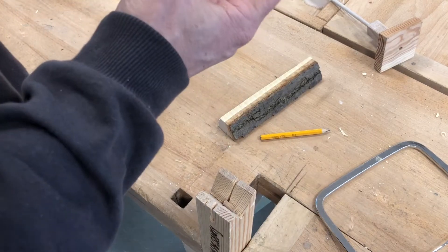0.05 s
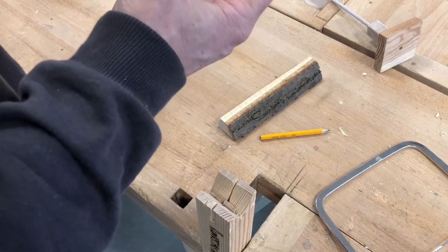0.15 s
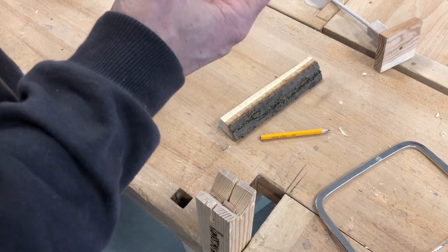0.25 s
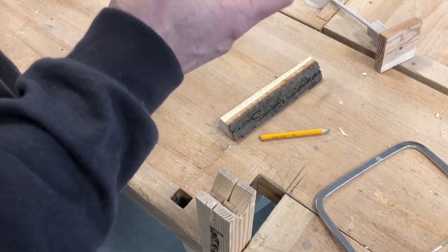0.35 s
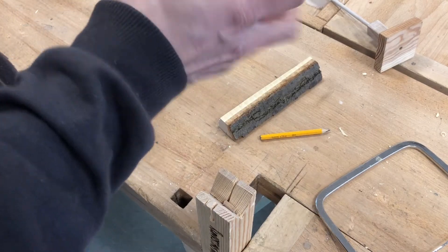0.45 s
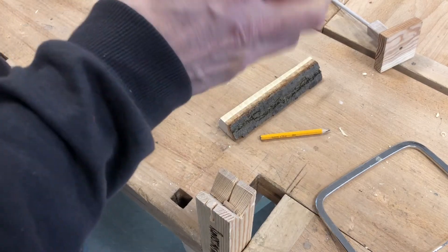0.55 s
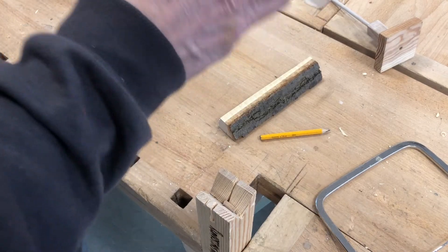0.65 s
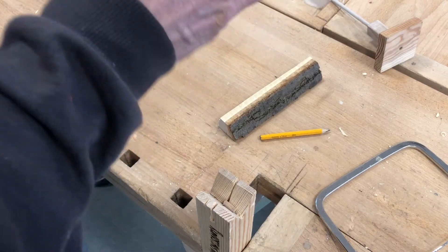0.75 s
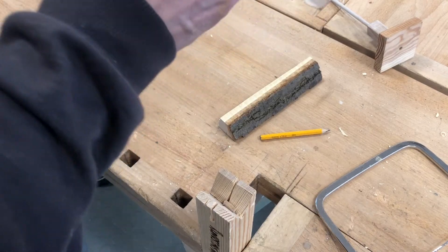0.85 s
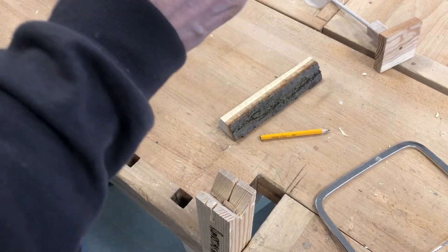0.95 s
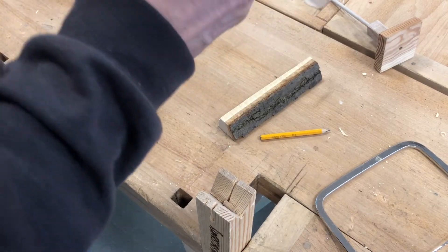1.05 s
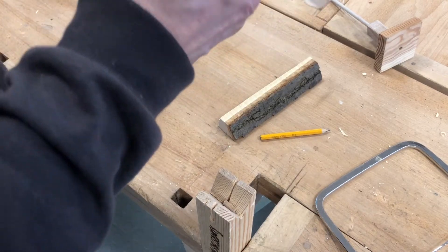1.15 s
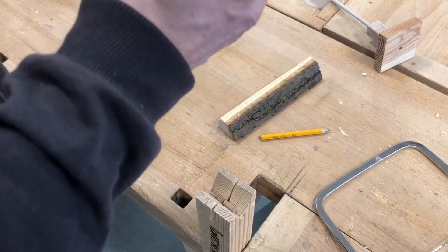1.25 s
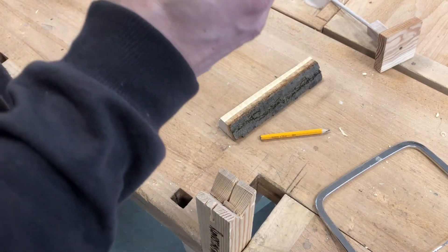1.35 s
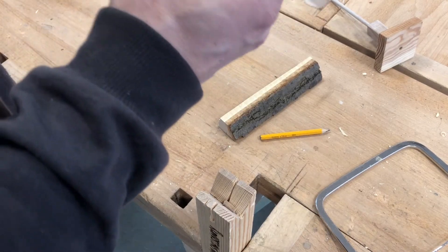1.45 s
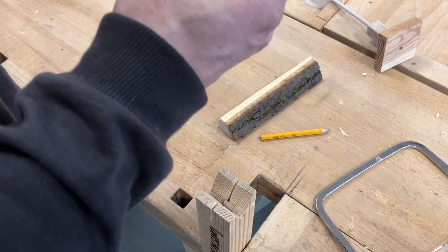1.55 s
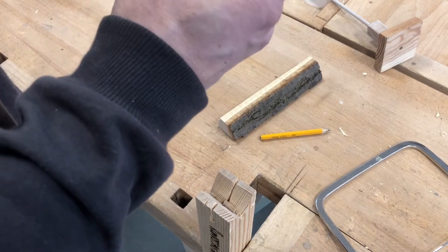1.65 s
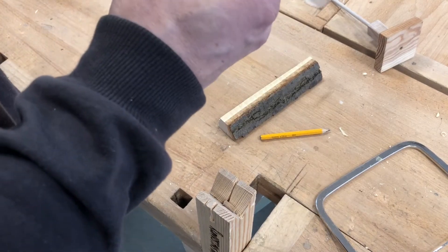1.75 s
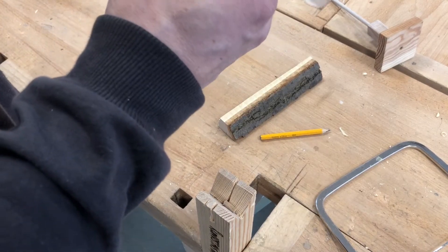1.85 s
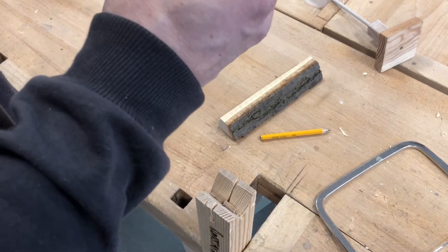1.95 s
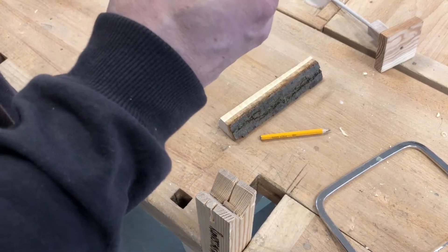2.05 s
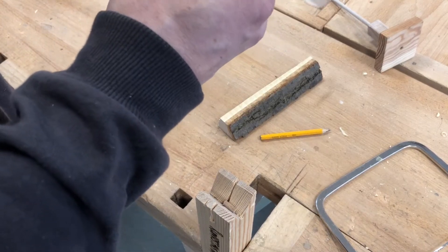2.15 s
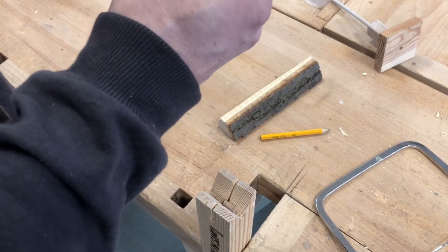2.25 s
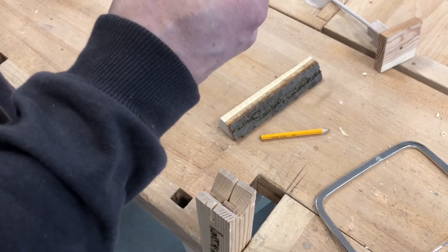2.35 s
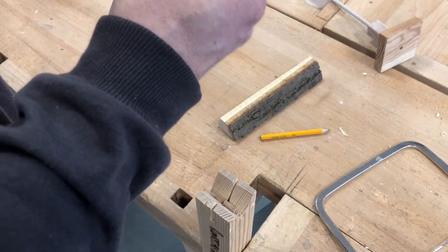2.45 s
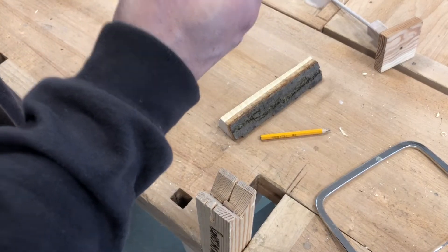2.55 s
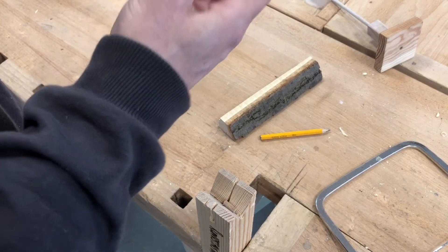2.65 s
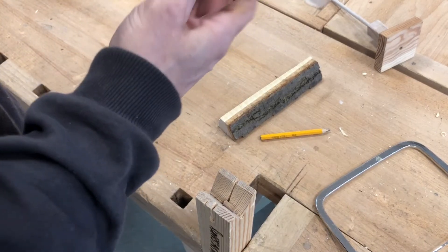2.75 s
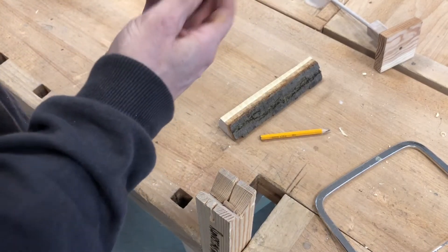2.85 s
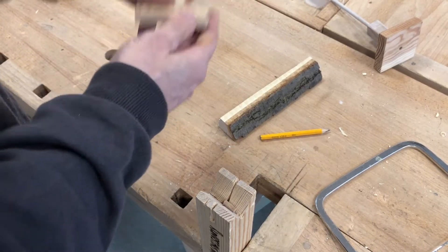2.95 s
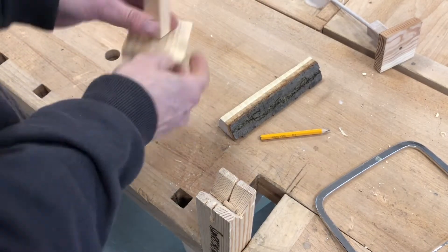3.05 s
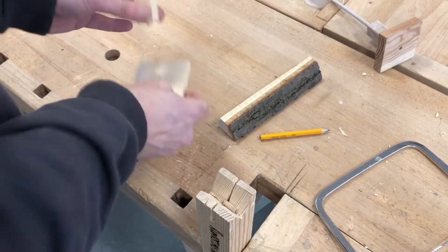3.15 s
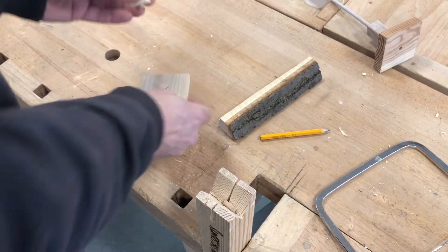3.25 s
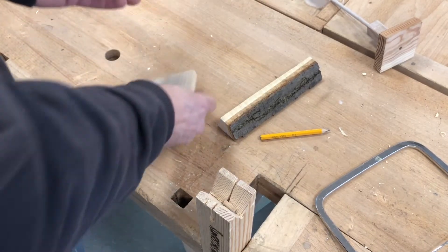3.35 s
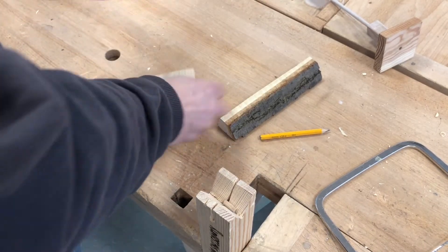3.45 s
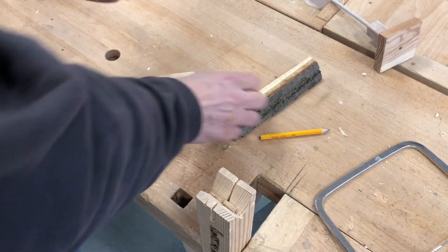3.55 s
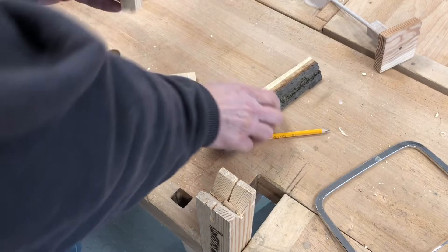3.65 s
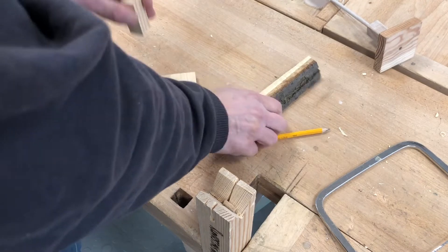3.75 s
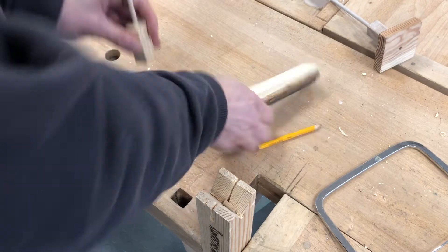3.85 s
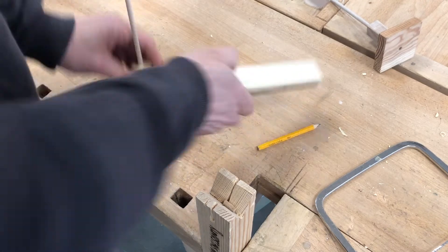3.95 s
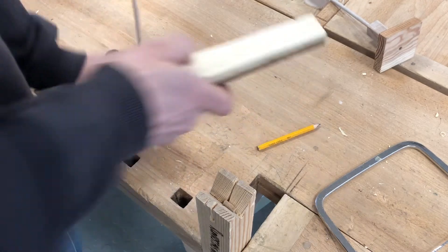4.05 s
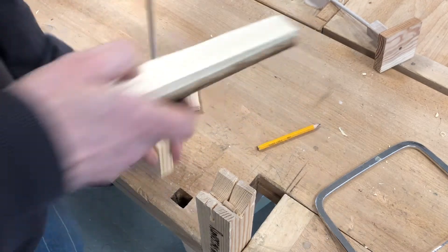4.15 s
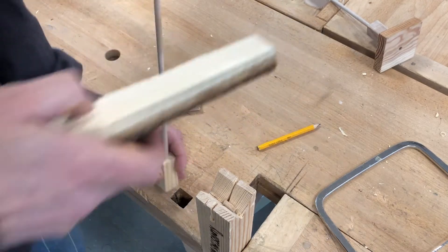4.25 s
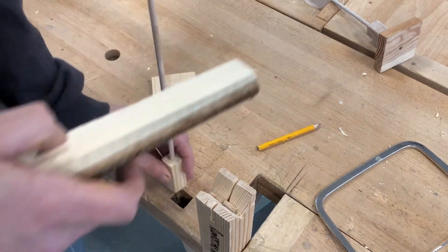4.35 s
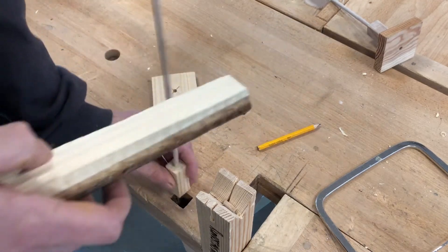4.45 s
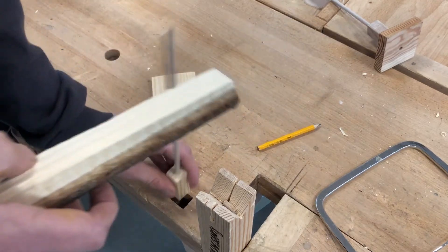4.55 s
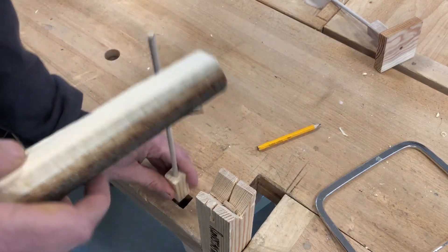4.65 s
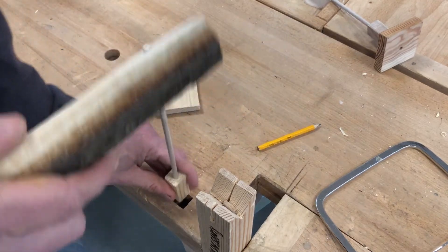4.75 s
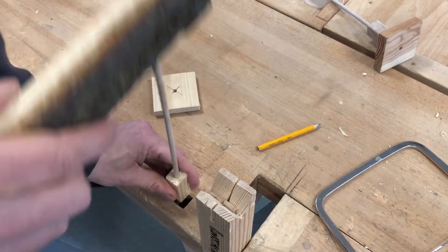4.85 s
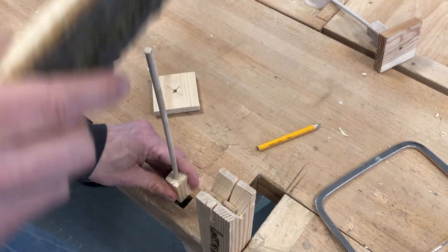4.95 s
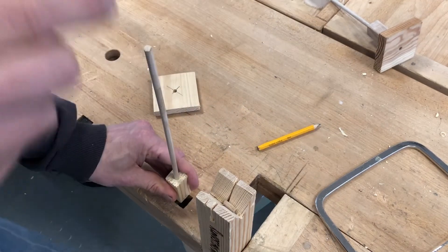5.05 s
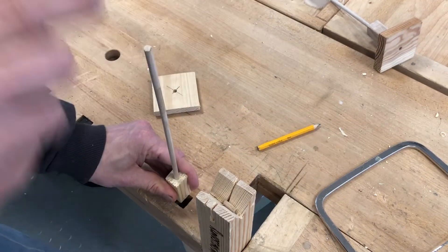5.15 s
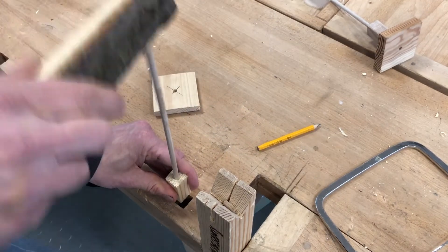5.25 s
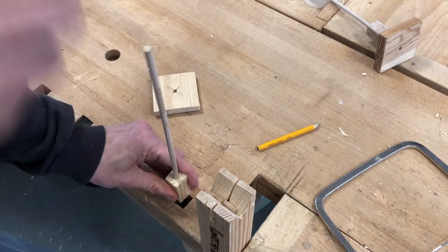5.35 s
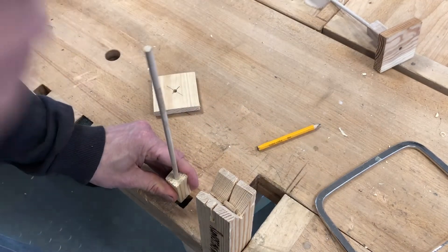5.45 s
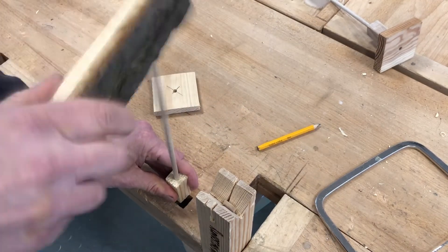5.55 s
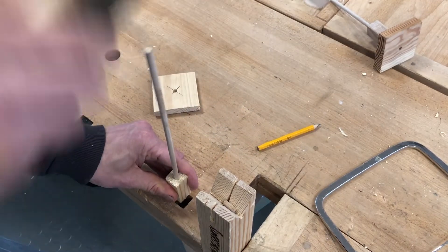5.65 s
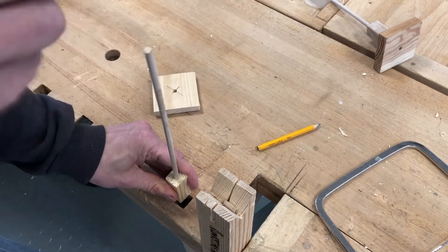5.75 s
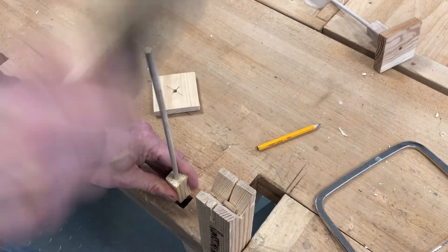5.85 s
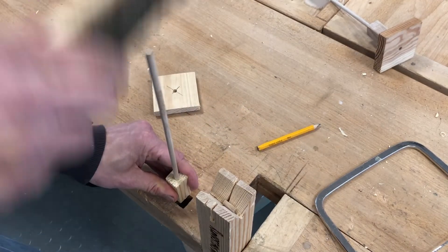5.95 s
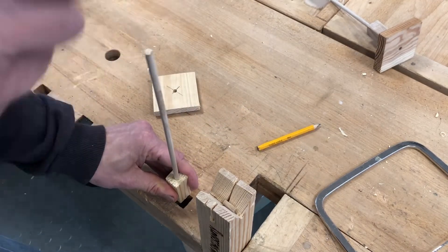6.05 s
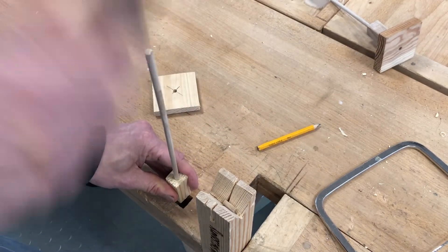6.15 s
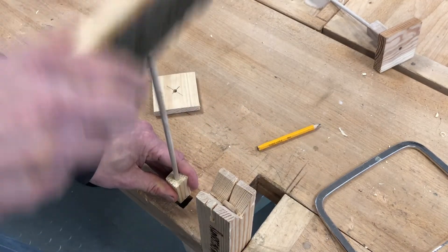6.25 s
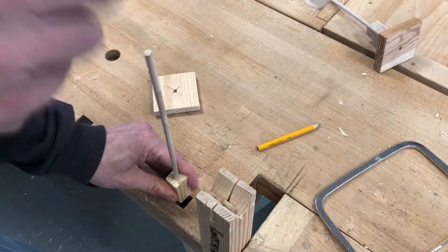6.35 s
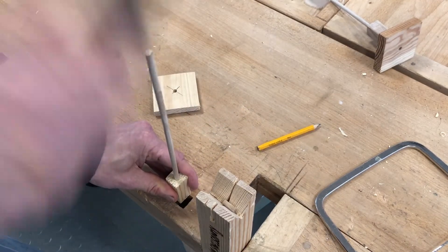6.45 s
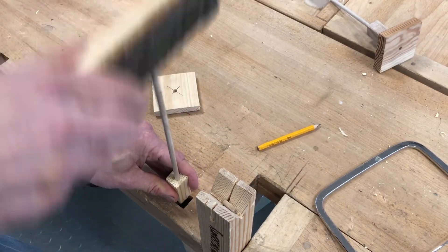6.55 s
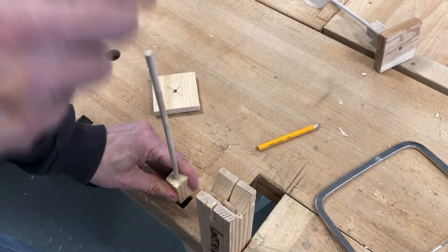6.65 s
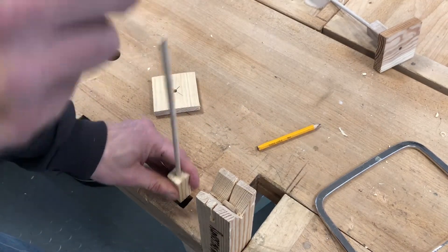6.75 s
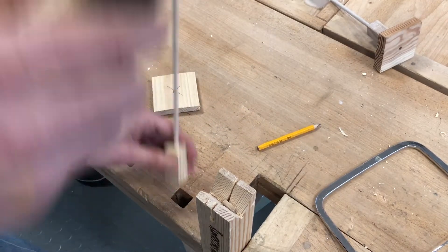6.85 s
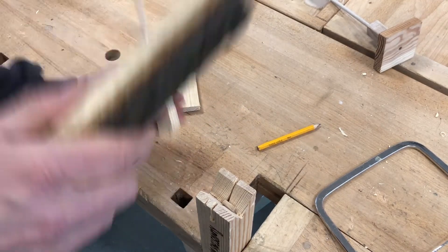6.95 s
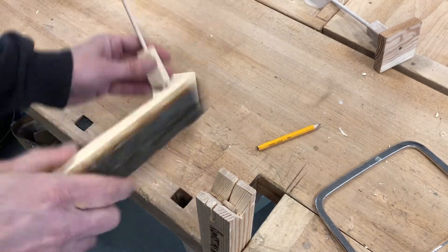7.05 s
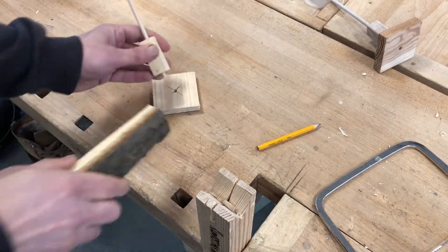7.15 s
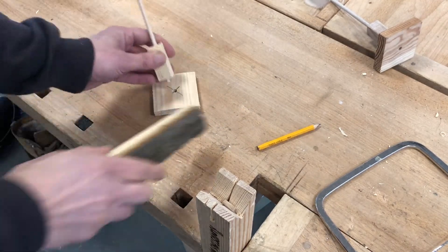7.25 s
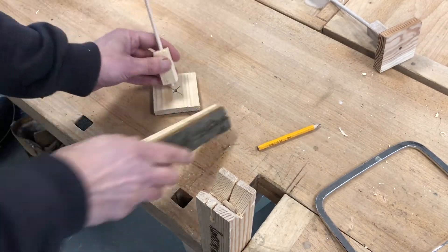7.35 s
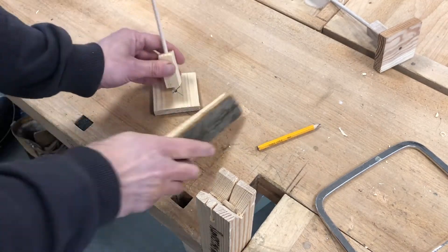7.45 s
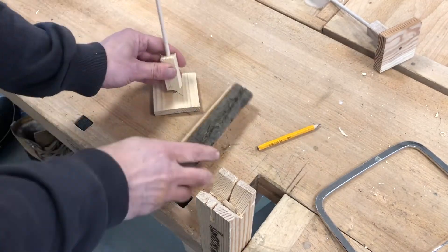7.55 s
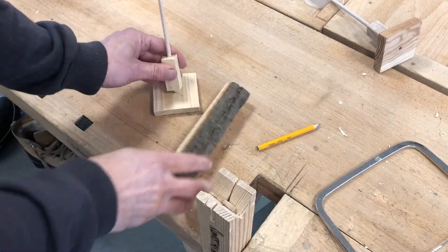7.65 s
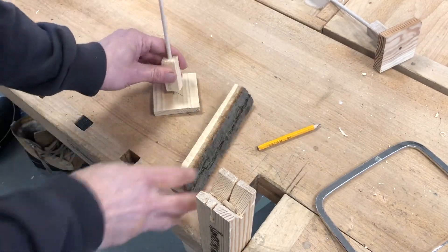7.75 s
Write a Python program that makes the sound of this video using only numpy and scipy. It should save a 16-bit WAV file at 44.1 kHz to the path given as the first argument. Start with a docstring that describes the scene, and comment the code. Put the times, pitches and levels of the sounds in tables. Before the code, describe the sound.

At a workbench in a small workshop, a sleeve rustles quietly with tiny bright ticks. A wooden block lands with a short rattle of knocks, followed by a brief scrape. Then a scrap stick strikes a dowel five times, hard and evenly, each crack distorting the close microphone while short room echo swells behind. Finally a dull knock and two clear woody taps.

```python
"""Five sharp wood cracks with a short room echo, amid light knocks, ticks and a sleeve rustling close by.
A block is set on a workbench, a dowel driven into a holder by a scrap stick, the holder tapped, the stick
laid aside. Wood is decaying modes plus noise bursts; slides are random slips; cloth is grainy noise.
The blows overload the recorder: its limiter ducks each crack and the workshop's echo swells up behind."""
import sys
import numpy as np
from scipy import signal
from scipy.fft import rfft, irfft
from scipy.io import wavfile

SR = 44100
rng = np.random.default_rng(int(sys.argv[2]) if len(sys.argv) > 2 else 0)


def generate_wav(sig):
    """Save sig (samples, or channels by samples) to the path in sys.argv[1] as 16-bit PCM at SR."""
    pcm = np.round(np.clip(np.atleast_2d(sig).T, -1, 1) * 32767).astype(np.int16)
    wavfile.write(sys.argv[1], SR, pcm)


N = 343980
TIME = np.arange(N) / SR
RING_TIME = TIME[:SR * 3 // 4]

# dowel modes: f/Hz, level/dB, t60/s
DOWEL_MODES = [(1224, -33, 0.071), (1623, -25, 0.053), (2500, -22, 0.025), (3229, 0.5, 0.025),
               (3516, -20.5, 0.036), (3680, -9.5, 0.03), (4840, -22.5, 0.012), (5270, -36, 0.013),
               (6650, -22.5, 0.012), (7300, -33.5, .02), (8950, -18, 0.0085)]
# dense stick modes: f/Hz, spectral level/dB
STICK_CLACK_SPECTRUM = [(150, -9), (400, 11), (900, -5), (1500, -8.5), (3500, 0.5), (5000, -12.5),
                        (15000, -1.5)]
# cloth hiss: f/Hz, spectral level/dB
CLOTH_SPECTRUM = [(200, 10.5), (600, 8), (1200, -0.5), (2100, 1), (2700, -6), (3600, -1), (4600, 0.5),
                  (5600, -6), (6800, -3.5), (8200, -7), (10500, -8.5), (12000, -1.5), (14000, -8.5),
                  (16000, 2)]


def from_db(db):
    """Decibels to amplitude gain."""
    return 10 ** (np.asarray(db) / 20)


def rms_one(x):
    """Scale to unit power."""
    return x / np.sqrt(np.mean(x ** 2) + 1e-20)


def at_hz(points, hz):
    """Interpolate a table on a log-frequency axis."""
    f, value = np.transpose(points)
    return np.interp(np.log(np.maximum(hz, 1)), np.log(f), value)


def butter(x, hz, kind, order=2):
    """Causal Butterworth filter."""
    safe_hz = np.clip(hz, 10, SR * 0.45)
    return signal.sosfilt(signal.butter(order, safe_hz, kind, fs=SR, output="sos"), x)


def noise(spectrum, size):
    """Gaussian noise shaped to a spectrum, rms 1."""
    gain = from_db(at_hz(spectrum, np.fft.rfftfreq(size, 1 / SR)))
    return rms_one(irfft(rfft(rng.standard_normal(size)) * gain, size))


def dying(t60_s):
    """Exponential decay, 60 dB in t60."""
    return np.exp(-np.log(1000) * RING_TIME / max(t60_s, 1e-3))


def add(track, t_s, sound):
    """Mix a sound in at a given time."""
    start = max(round(t_s * SR), 0)
    track[start:start + len(sound)] += sound[:N - start]


def ring(modes):
    """Free vibration of a struck body: decaying sines, neighbouring modes in opposite sign."""
    out = np.zeros(len(RING_TIME))
    for k, (hz, level_db, t60_s) in enumerate(modes):
        out += (-1) ** k * from_db(level_db) * dying(t60_s) * np.sin(2 * np.pi * hz * RING_TIME)
    return out


def clack(spectrum, t60_s):
    """Many close, heavily damped modes: a short burst with smooth spectrum and random phases."""
    size = len(RING_TIME)
    half_decay = dying(2 * t60_s)  # applied twice, giving t60_s
    burst = rfft(rng.standard_normal(size) * half_decay)
    colour = from_db(at_hz(spectrum, np.fft.rfftfreq(size, 1 / SR)))
    sound = irfft(burst / np.abs(burst) * colour, size) * half_decay
    return rms_one(sound) * np.sqrt(np.mean(dying(t60_s) ** 2))


def stroke(start_s, rise_s, hold_s, release_s):
    """Hand speed: linear rise, hold, exponential fall with time constant release_s."""
    speeding = np.clip((TIME - start_s) / max(rise_s, 1e-3), 0, 1)
    after_hold = np.maximum(TIME - start_s - rise_s - hold_s, 0)
    return speeding * np.exp(-after_hold / max(release_s, 1e-3))


def room_rumble():
    """Steady low rumble of the room: shaped noise."""
    # f/Hz, spectral level/dB
    rumble_spectrum = [(20, -25), (35, -11.5), (55, -1), (90, 1.5), (170, 1.5), (260, -2), (380, -7.5),
                       (600, -13), (1100, -20), (2000, -25), (3500, -30.5), (6000, -34.5), (15000, -43)]
    return from_db(-51) * noise(rumble_spectrum, N)


def workshop(x, wet_db, build_s):
    """Diffuse echo: builds up over the first reflections, then each band decays at its own rate."""
    # decay: f/Hz, t60/s
    room_t60 = [(80, 0.7), (200, 0.38), (560, 0.51), (1500, 0.4944), (3500, 0.5067), (6500, 0.31),
                (10000, 0.3), (15000, 0.33)]
    # colour: f/Hz, level/dB
    room_colour = [(80, 9), (300, 4.5), (1000, 3.5), (3000, -2.5), (7000, -5.4), (10000, -7), (15000, -2.5)]
    edges_hz = np.geomspace(50, 18000, 18)
    echo = np.zeros(len(RING_TIME))
    for low_hz, high_hz in zip(edges_hz, edges_hz[1:]):
        centre_hz = np.sqrt(low_hz * high_hz)
        band = butter(rng.standard_normal(len(RING_TIME)), [low_hz, high_hz], "band")
        echo += from_db(at_hz(room_colour, centre_hz)) * band * dying(at_hz(room_t60, centre_hz))
    echo *= np.minimum(RING_TIME / build_s, 1) ** 2
    unit_echo = echo / np.sqrt(np.sum(echo ** 2))
    return from_db(wet_db) * signal.fftconvolve(x, unit_echo)[:N]


def sleeve(grain_db, waver_db, waver_hz, cloth_db, wood_db):
    """Cloth hisses in fine grains as each arm move swells and fades; it scuffs where pressed harder."""
    # arm moves, sleeve and fingers on wood: middle t/s, half length/s, level/dB, treble shelf/dB
    moves = [(0.503, 0.1, -63, 9), (0.966, 0.26, -49, 2), (1.347, 0.11, -61.5, 4), (2.015, .17, -50, -16),
             (2.527, 0.16, -59.5, 7), (2.973, 0.14, -54.5, 7), (3.42, 0.35, -53.5, -3),
             (3.785, 0.089, -47, 0), (4.066, 0.25, -50.5, -10.5), (4.693, 0.23, -51.5, -2.5),
             (5.12, 0.17, -55, -8.5), (7.342, 0.35, -47.5, -17)]
    # brief, duller scuffs: t/s, level/dB, length/s
    scuffs = [(0.285, -43, 0.0054), (0.52, -59, 0.017), (0.856, -49, 0.017), (0.983, -47.5, 0.032),
              (1.194, -42, 0.012), (1.416, -50.5, 0.017), (2.437, -50, .012), (2.788, -51, 0.025),
              (7.127, -48, .012)]
    # scuff colour: f/Hz, spectral level/dB
    scuff_spectrum = [(200, -2), (500, 5), (1200, -16), (2100, 3.5), (2700, 0), (3600, 2), (5200, -6),
                      (6800, -5), (9000, -9), (15000, -3.5)]
    # wood resonances excited by rubbing: f/Hz, level/dB, t60/s
    rubbed_modes = [(2425, 1, .014), (3270, 6.5, 0.0061), (5660, -3, 0.0091), (6505, -2, 0.012),
                    (10400, 1, 0.0048), (13850, 1.5, .007)]
    treble_hz, resting_db = 5380, -64
    evenness = 3.0  # 2 is a bell-shaped swell, higher holds speed longer

    wood = rms_one(signal.fftconvolve(rng.standard_normal(N), ring(rubbed_modes))[:N])
    hiss = from_db(cloth_db) * noise(CLOTH_SPECTRUM, N) + from_db(wood_db) * wood
    treble = butter(hiss, treble_hz, "high", order=1)
    rubbing = np.zeros(N)
    for middle_s, half_s, level_db, treble_db in moves:
        speed = np.exp(-np.abs((TIME - middle_s) / half_s) ** evenness)
        rubbing += from_db(level_db) * speed * (hiss + (from_db(treble_db) - 1) * treble)
    press = np.zeros(N)
    for t_s, level_db, length_s in scuffs:
        press += from_db(level_db) * np.exp(-((TIME - t_s) / length_s) ** 2)

    waver = from_db(waver_db * rms_one(butter(rng.standard_normal(N), waver_hz, "low")))
    grain = rms_one(from_db(grain_db * rms_one(butter(rng.standard_normal(N), 200, "low"))))
    moving = grain * (waver * rubbing + press * noise(scuff_spectrum, N))
    return moving + from_db(resting_db) * noise(CLOTH_SPECTRUM, N)


def handling_ticks(t60_s):
    """Cloth and wood being handled: tiny bright snaps over a broad click."""
    # t/s, level/dB, centre f/Hz
    ticks = [(0.108, -42.5, 14100), (0.192, -46, 13500), (0.265, -35.5, 13000), (0.2818, -32, 13400),
             (0.288, -53, 6950), (0.7312, -24, 14500), (0.809, -29, 10200), (1.3286, -22, 13200),
             (1.834, -39, 14100), (2.897, -42, 11200), (3.3625, -30, 12500), (5.376, -33.5, 7400)]
    out = np.zeros(N)
    for t_s, level_db, hz in ticks:
        spectrum = [(hz / 20, -17), (hz / 2, -13), (hz, 0), (hz * 2, -16)]
        add(out, t_s, from_db(level_db) * clack(spectrum, t60_s))
    return out


def arm_bumps(t60_s):
    """Soft bumps of the arm: one low mode that swells for a few cycles, then decays."""
    # t/s, level/dB, f/Hz
    bumps = [(0.365, -34, 80), (2.598, -37.5, 97), (4.692, -38, 100.9), (6.868, -36, 140.3)]
    out = np.zeros(N)
    for t_s, level_db, hz in bumps:
        add(out, t_s, from_db(level_db) * ring([(hz, 6, t60_s)]) * (1 - dying(t60_s / 2)))
    return out


def bench(contact_hz):
    """The bench top booms; a longer contact (lower cutoff) leaves only its lower modes."""
    # f/Hz, level/dB, t60/s
    bench_modes = [(98, -30, 0.14), (138, -37, 1), (191, -24, 0.33), (235.6, -24, 0.42), (265, -18, 0.091),
                   (316.3, -10, 0.24), (356, -21, 0.72), (390.6, -9, 0.13), (486.7, -7, 0.14),
                   (544.6, -13, 0.24), (611, -6, 0.2), (794, -13, 0.2), (950, -20.5, 0.36),
                   (998, -8.5, 0.05)]
    # dense modes between them: f/Hz, spectral level/dB
    thud_spectrum = [(30, -40.5), (55, -25.5), (85, -15.5), (140, -2.5), (250, -3.5), (340, 5), (430, -2),
                     (600, -1), (800, -8), (1100, -14.5), (2000, -21), (6000, -48.5)]
    return butter(ring(bench_modes) + clack(thud_spectrum, 0.15), contact_hz, "low", order=1)


def slide(grains_per_s, pressure_power):
    """Wood fibres catch and slip at random, keeping the dowel and the bench under it ringing."""
    # wood dragged over wood: start t/s, rise/s, hold/s, squeak level/dB, bench level/dB
    slides = [(3.686, 0.12, 0.014, -33, -44.5), (7.386, 0.025, .13, -46, -41.5),
              (7.543, .02, 0.1, -63, -36.5)]
    # modes kept alive by sliding: f/Hz, level/dB, t60/s
    squeak_modes = [(3198, 5, 0.042), (3580, -1, 0.03), (5190, -15, 0.028), (6580, -19, 0.032)]
    slips = (rng.random(N) < grains_per_s / SR) * rng.standard_normal(N)
    squeak = rms_one(signal.fftconvolve(slips, ring(squeak_modes))[:N])
    rumble = rms_one(signal.fftconvolve(slips, butter(bench(1000), 200, "high"))[:N])
    out = np.zeros(N)
    for start_s, rise_s, hold_s, squeak_db, bench_db in slides:
        speed = stroke(start_s, rise_s, hold_s, release_s=0.052)
        out += from_db(squeak_db) * speed ** pressure_power * squeak
        out += from_db(bench_db) * speed * rumble
    return out


def knocks(rows, modes, spectrum, clack_db, clack_t60_s, lowest_hz):
    """A light piece lands on wood: it rings itself, but hardly stirs the bench's deepest modes."""
    out = np.zeros(N)
    for t_s, ring_db, contact_hz, bench_db in rows:
        wood = ring(modes) + from_db(clack_db) * clack(spectrum, clack_t60_s)
        add(out, t_s, from_db(ring_db) * butter(wood, contact_hz, "low"))
        add(out, t_s, from_db(bench_db) * butter(bench(contact_hz), lowest_hz, "high"))
    return out


def hand_knocks():
    """Two held pieces click together and ring in their own modes."""
    # t/s, ring level/dB, contact cutoff f/Hz, bench level/dB
    rows = [(0.8091, -23.5, 5200, -41)]
    # held pieces: f/Hz, level/dB, t60/s
    held_modes = [(264, -14.5, 0.067), (410, -5.5, 0.039), (970, -4.5, 0.035), (1400, -9, 0.029),
                  (2680, -9, .025), (3460, -19, 0.027), (3980, -13, 0.028), (4520, -8.5, .035)]
    return knocks(rows, held_modes, STICK_CLACK_SPECTRUM, clack_db=8.5, clack_t60_s=0.014, lowest_hz=300)


def stick_knocks():
    """Duller knocks of wood meeting the bench, rung in the stick's modes."""
    # t/s, ring level/dB, contact cutoff f/Hz, bench level/dB
    rows = [(4.432, -50, 2000, -39), (7.5572, -14, 1940, -19.5), (7.6035, -29, 1700, -25.5)]
    # stick: f/Hz, level/dB, t60/s
    stick_modes = [(805, 1.5, 0.073), (1082, -7, 0.047), (1560, 0.5, 0.02), (2230, -7, 0.027),
                   (3070, -26, .02)]
    return knocks(rows, stick_modes, STICK_CLACK_SPECTRUM, clack_db=5.5, clack_t60_s=0.03, lowest_hz=308)


def block_knocks():
    """The square block lands, rocks and is nudged, ringing in its own modes."""
    # t/s, ring level/dB, contact cutoff f/Hz, bench level/dB
    rows = [(3.3603, -8, 3480, -23.5), (3.384, -26, 3000, -31.5), (3.399, -35, 3000, -36),
            (3.4378, -20.5, 2510, -34.5), (3.4778, -11.5, 7400, -25.5), (3.5423, -18.5, 1800, -32),
            (3.6406, -33, 1990, -40.5), (7.3025, -29.5, 6960, -40), (7.3125, -36, 6170, -41)]
    # block: f/Hz, level/dB, t60/s
    block_modes = [(931, -33, 0.27), (1085, -9, 0.043), (1644, -32.5, 0.038), (1900, -20, 0.05),
                   (2260, 0.5, 0.036), (2390, -17.5, 0.13), (3250, -7.5, 0.032), (4400, -39, .03),
                   (6520, -5, 0.019)]
    # dense block modes: f/Hz, spectral level/dB
    block_spectrum = [(200, -42.5), (500, -18), (1400, -3), (2200, 6), (2650, -33), (3300, -2.5),
                      (4400, 4.5), (5700, -12.5), (6700, -69), (8000, -25), (15000, -14.5)]
    return knocks(rows, block_modes, block_spectrum, clack_db=3.0, clack_t60_s=0.011, lowest_hz=330)


def holder_taps():
    """The holder meets the block; the dowel in it rings."""
    # t/s, ring level/dB, contact cutoff f/Hz, bench level/dB
    rows = [(3.798, -21.5, 4100, -51), (7.405, -42, 774, -28.5), (7.7252, 0, 3970, -17),
            (7.7838, -1.5, 4370, -19.5)]
    # dense dowel modes: f/Hz, spectral level/dB
    dowel_spectrum = [(200, -30), (500, -18), (820, -49), (1300, 13), (1900, 15), (3200, -19.5), (4200, 23),
                      (5000, -54), (8000, -15), (15000, 18)]
    return knocks(rows, DOWEL_MODES, dowel_spectrum, clack_db=-2, clack_t60_s=0.014, lowest_hz=300)


def blows(ring_spread_db):
    """Stick cracks on dowel; both ring and the bench is driven. Returns near sound and room feed."""
    # t/s, dowel ring/dB, overtone/dB, crack/dB, contact cutoff f/Hz,
    # bench/dB, bench contact cutoff f/Hz, stick bend/dB
    blow_rows = [(5.225, -8.5, 1, 1, 11500, -8.5, 1560, -19.5),
                 (5.543, 4.5, -1.5, 12.5, 8300, -6, 496, -23.5),
                 (5.8635, 7, -10, 11.5, 7280, -2, 386, -28.5), (6.176, 15, -14, 12.5, 5600, -3, 384, -39),
                 (6.474, 11, 3.5, 12, 6260, -5, 380, -23)]
    # upper dowel modes: f/Hz, level/dB, t60/s
    overtones = [(6370, -2.5, 0.013), (6780, -13, 0.028)]
    # dense modes of the crack: f/Hz, spectral level/dB
    crack_spectrum = [(40, -35.5), (200, -18), (600, -9.5), (1000, -14), (1650, 0), (2000, -6), (2700, -5),
                      (3500, 4.5), (4300, -4.5), (5500, -6), (6600, 1), (7500, 0), (8400, -17.5),
                      (15500, -5.5)]
    # bending modes of the swung stick: f/Hz, level/dB, t60/s
    bend_modes = [(655, -0.5, 0.39), (674, -1.5, 0.31), (712, -11, 0.18)]
    side_tick_s, before_db, after_db = 0.0225, -38.5, -22  # faint copies around each crack

    near, spread = np.zeros((2, N))
    for t_s, ring_db, overtone_db, crack_db, contact_hz, bench_db, bench_hz, bend_db in blow_rows:
        dowel = from_db(ring_db) * butter(ring(DOWEL_MODES), contact_hz, "low")
        dowel += from_db(overtone_db) * ring(overtones)
        crack = from_db(crack_db) * butter(clack(crack_spectrum, 0.013), contact_hz, "low")
        body = from_db(bench_db) * bench(bench_hz) + from_db(bend_db) * ring(bend_modes)
        add(near, t_s, dowel + crack + body)
        # the thin dowel radiates less into the room
        add(spread, t_s, from_db(ring_spread_db) * dowel + crack + body)
        add(near, t_s - side_tick_s, from_db(before_db) * crack)
        add(near, t_s + side_tick_s, from_db(after_db) * crack)
    return near, spread


def scene():
    """All the wood, its echo, the sleeve and the room's low rumble; one channel."""
    handling = slide(grains_per_s=6800, pressure_power=2.9)
    handling += handling_ticks(t60_s=0.0059) + arm_bumps(t60_s=0.13)
    handling += block_knocks() + holder_taps() + stick_knocks() + hand_knocks()
    near, spread = blows(ring_spread_db=-6.5)
    # light handling, low on the bench, reaches the room less than the blows
    echo = workshop(spread + from_db(-6) * handling, wet_db=-15.5, build_s=0.0032)
    cloth = sleeve(grain_db=2.0, waver_db=1.4, waver_hz=28, cloth_db=-1.5, wood_db=-7.0)
    return (near + handling + echo + cloth + room_rumble())[None]


def limiter(x, threshold_db, release_db_per_s, attack_s, lag_s):
    """Gain reacts late, so peaks slip past; it then dips and recovers at a steady dB rate."""
    over_db = np.maximum(20 * np.log10(np.abs(x[0]) + 1e-9) - threshold_db, 0)
    fall_db = release_db_per_s * TIME
    held_db = np.maximum.accumulate(over_db + fall_db) - fall_db
    late_db = np.interp(TIME - lag_s, TIME, held_db)
    pole = np.exp(-1 / (attack_s * SR))
    cut_db = signal.lfilter([1 - pole], [1, -pole], late_db)
    return x * from_db(-cut_db)


def record(dry):
    """Limiter, hard clipping of what slips past it, bass roll-off and steep top cut."""
    limited = limiter(dry, threshold_db=1.5, release_db_per_s=954.0, attack_s=0.00082, lag_s=0.00022)
    loud = butter(np.clip(limited, -1, 1), 32, "high")
    top_cut = signal.cheby2(16, 70, 16500, fs=SR, output="sos")  # 70 dB down from 16.5 kHz
    return signal.sosfilt(top_cut, loud)


dry = scene()
out = record(dry)
generate_wav(out)
```